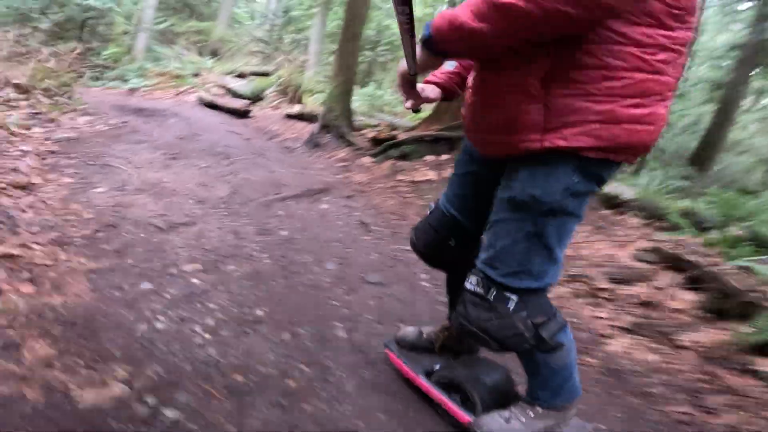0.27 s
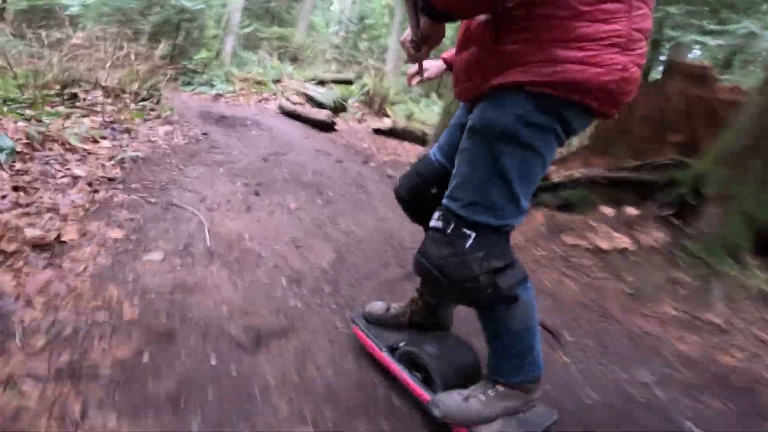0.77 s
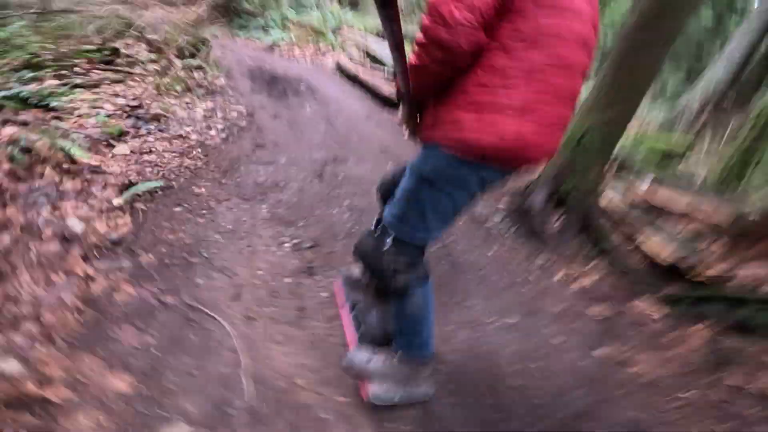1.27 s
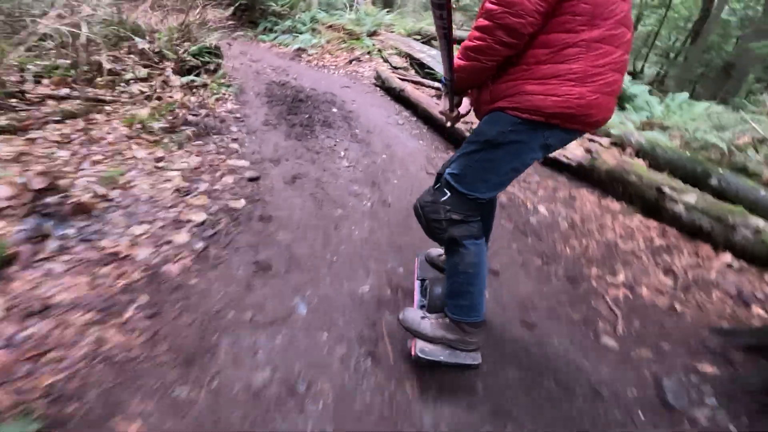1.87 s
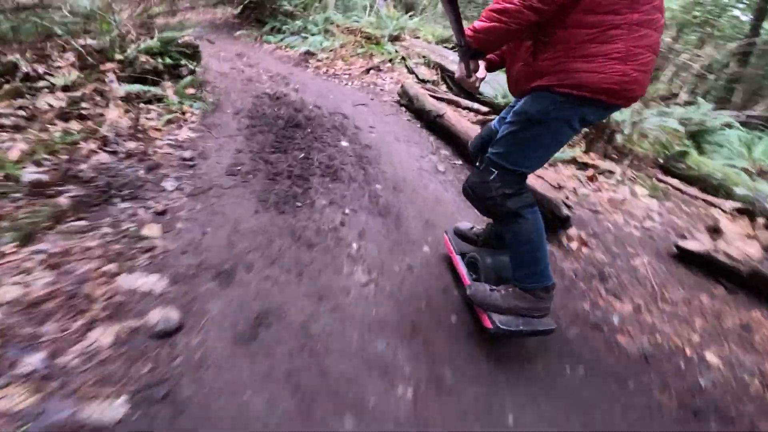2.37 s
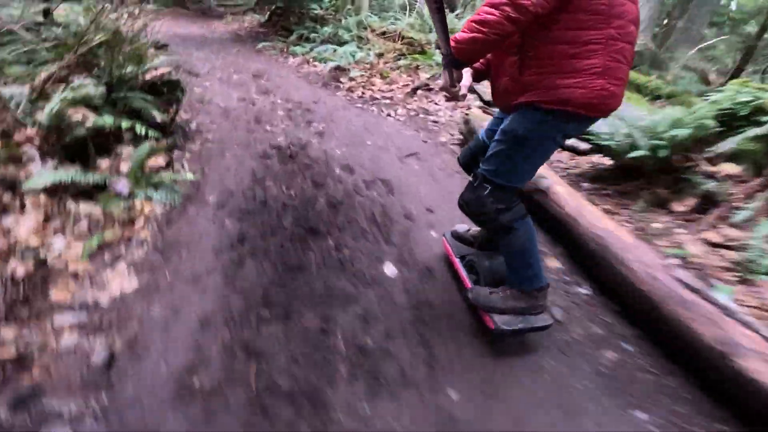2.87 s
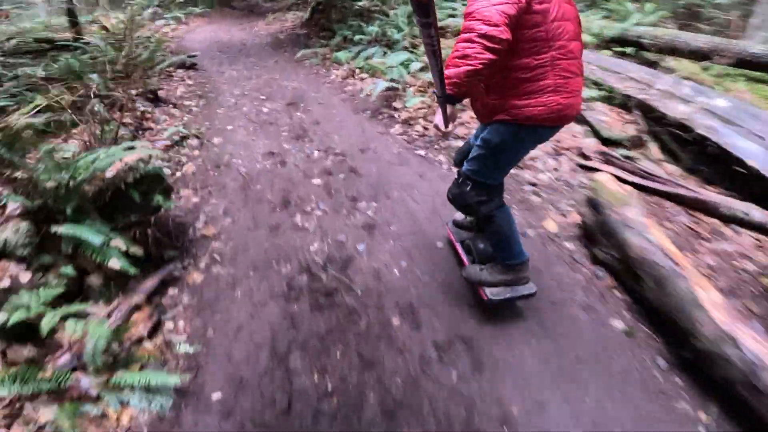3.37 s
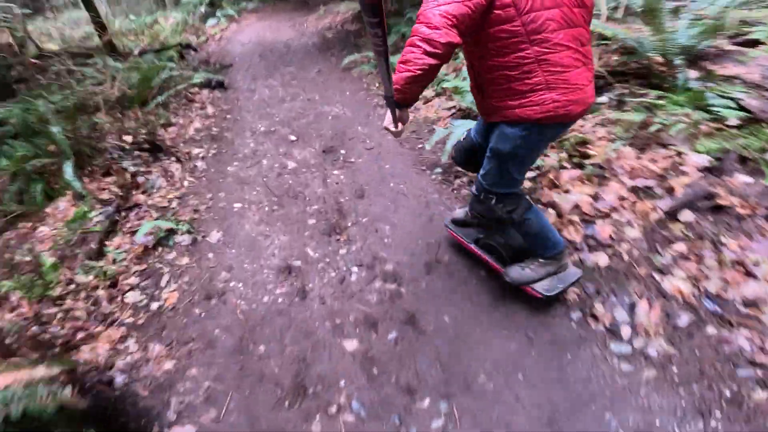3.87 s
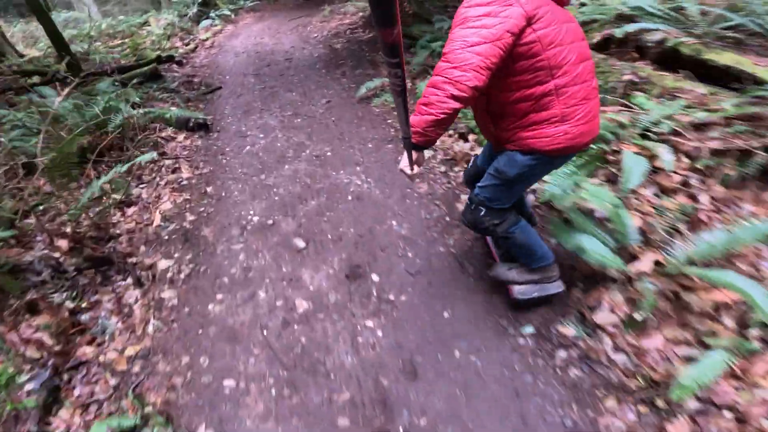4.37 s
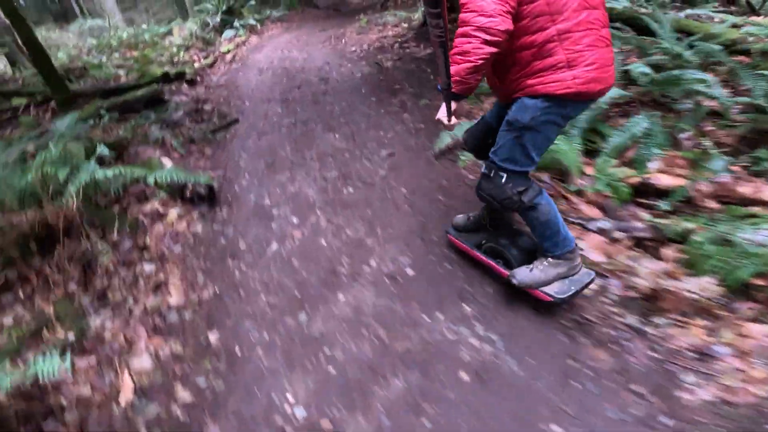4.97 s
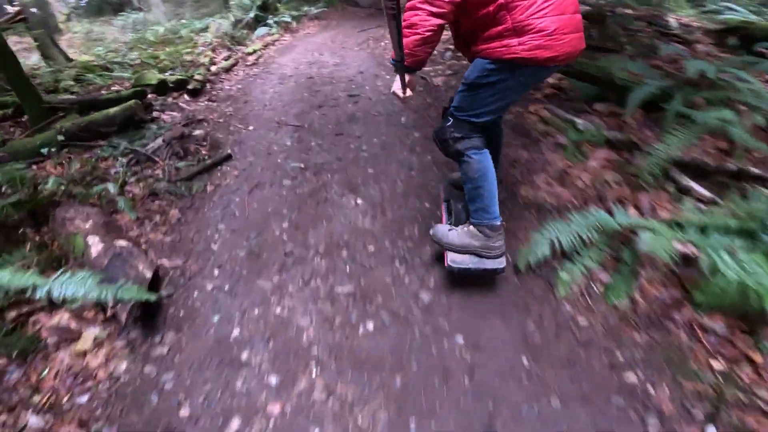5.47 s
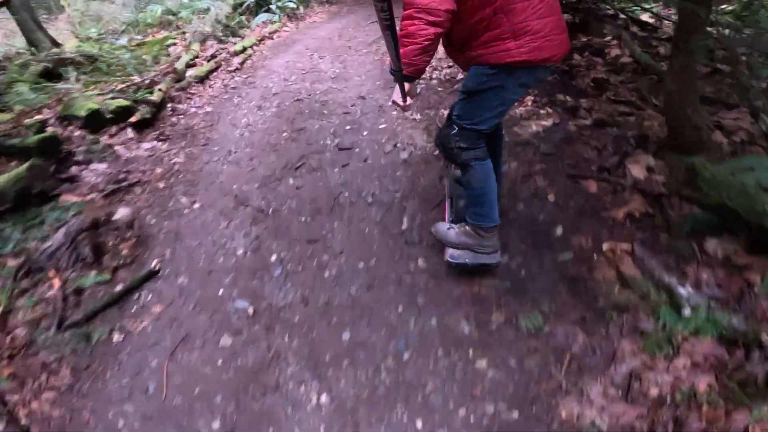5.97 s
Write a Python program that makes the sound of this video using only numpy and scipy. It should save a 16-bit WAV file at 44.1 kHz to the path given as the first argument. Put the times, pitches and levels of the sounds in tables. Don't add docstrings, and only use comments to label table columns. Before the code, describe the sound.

Wind thumps a pole-mounted microphone while a fat tyre drums over dirt, the motor hums waveringly, and wet gravel hisses midway.

```python
import sys
import numpy as np
from scipy import signal
from scipy.fft import rfft, irfft
from scipy.io import wavfile
from scipy.ndimage import uniform_filter1d

SR = 44100
rng = np.random.default_rng(int(sys.argv[2]) if len(sys.argv) > 2 else 0)


def gain_from_db(level_db):
    decades = np.asarray(level_db, float) / 20
    return 10 ** decades


def wav_out(sig):
    wavfile.write(sys.argv[1], SR, np.round(np.clip(np.atleast_2d(sig).T, -1, 1) * 32767).astype(np.int16))


N = 274302


def rms_one(x):
    return x / np.sqrt(np.mean(x ** 2) + 1e-20)


def in_time(rows):
    s, *columns = np.transpose(rows)
    return [np.interp(np.arange(N) / SR, s, c) for c in columns]


def drift(rate):
    r = np.exp(-40 * np.pi * rate / SR)
    noise = rng.standard_normal(N // 20 + 2002)
    slow = signal.lfilter([1], [1, -2 * r, r * r], noise)[2000:]
    return np.interp(np.arange(N) / 20, np.arange(len(slow)), rms_one(slow))


def coloured(x, spectrum):
    hz, db = np.transpose(spectrum)
    grid = np.maximum(np.fft.rfftfreq(N, 1 / SR), 1)
    slope_db = -24 * np.maximum(np.log2(hz[0] / grid), 0)
    gain = gain_from_db(np.interp(np.log(grid), np.log(hz), db) + slope_db)
    return rms_one(irfft(rfft(x) * gain, N))


def resonate(x, hz, width_hz):
    r = np.exp(-np.pi * width_hz / SR)
    feedback = [1, -2 * r * np.cos(2 * np.pi * hz / SR), r * r]
    return signal.lfilter([(1 - r * r) / 2, 0, (r * r - 1) / 2], feedback, x)


def resonate_twice(x, hz, width_hz):
    return resonate(resonate(x, hz, width_hz), hz, width_hz)


def evened(x, seconds, share):
    swell = uniform_filter1d(x ** 2, size=int(seconds * SR)) + 1e-3
    return rms_one(x / swell ** (share / 2))


def crunch(per_s, spread_db, grain_s, smooth):
    born = rng.random(N) < per_s / SR
    sizes = gain_from_db(spread_db * np.minimum(rng.exponential(1, N), 2.5)) * born
    r = np.exp(-1 / (grain_s * SR))
    bursts = signal.lfilter([1], [1, -2 * r, r * r], sizes + 1e-18)
    return rng.standard_normal(N) * (smooth + bursts / bursts.mean())


def swells(rows, calm_db):
    t, out = np.arange(0, N, 64) / SR, gain_from_db(calm_db)
    for s, length_s, db in rows:
        u = (t - s) / length_s
        u = np.where(u < 0, u / 0.5, u)
        out = out + gain_from_db(db) * np.exp(-u ** 2)
    return np.interp(np.arange(N) / SR, t, 20 * np.log10(out))


# top_s, length_s, buffet_db, flutter_share_db
GUSTS = [(0.0, 0.17, -15.5, -14), (0.41, 0.038, -46, 17.5), (0.468, 0.13, -27.5, -10.5),
         (0.729, 0.048, -15.5, -14), (0.915, 0.24, -26, -11), (1.387, 0.2, -24, -7.5),
         (1.552, 0.046, -44.5, 16.5), (1.747, 0.12, -20.5, -9.5), (1.966, 0.21, -48, 6.5),
         (1.967, 0.067, -24, -32), (2.205, 0.067, -74, -26), (2.356, 0.035, -45, -29),
         (2.723, 0.16, -28.5, -3.5), (3.002, 0.15, -42, 5.5), (3.25, 0.19, -33.5, -3),
         (3.451, 0.053, -26, 3), (3.617, 0.16, -24.5, -2.5), (3.916, 0.24, -25.5, 4),
         (4.139, 0.028, -41, 11.5), (4.2, 0.22, -29.5, -34), (4.46, 0.068, -33.5, -8),
         (4.603, 0.072, -27.5, -1.5), (4.755, 0.26, -39.5, -38), (4.962, 0.062, -50, 10.5),
         (5.518, 0.12, -33.5, -11.5), (5.707, 0.038, -46.5, 13), (5.878, 0.055, -34.5, 4.5),
         (6.056, 0.42, -32.5, -1.5)]
# pitch_hz, level_db [dB per Hz]
BUFFET = [(12, 16.5), (25, 17.5), (45, 10.5), (70, 7), (110, -6), (200, -63)]
FLUTTER = [(45, -39), (68, 7.5), (95, 9), (125, 5.5), (160, -9), (250, -62)]
EDDIES = [(100, -36), (140, -0.5), (200, -2), (250, -9.5), (330, -15.5), (600, -66)]


def wind():
    buffet_db = 3.0 + swells([row[:3] for row in GUSTS], calm_db=-46)
    flutter_rows = [(s, length_s, db + share_db) for s, length_s, db, share_db in GUSTS]
    flutter_db = swells(flutter_rows, calm_db=-52.5)
    usual_db = flutter_db.mean()
    rattle_db = -5 + usual_db + 0.94 * (flutter_db - usual_db)
    buffet = evened(coloured(rng.standard_normal(N), BUFFET), seconds=0.0553, share=0.96)
    lumps = gain_from_db(4.8 * drift(26.8))
    flutter = evened(coloured(lumps * rng.standard_normal(N), FLUTTER), seconds=0.087, share=0.65)
    rattle = evened(coloured(lumps * rng.standard_normal(N), EDDIES), seconds=0.095, share=0.65)
    gusts = gain_from_db(buffet_db) * buffet + gain_from_db(flutter_db) * flutter + gain_from_db(rattle_db) * rattle
    return 0.32 * np.tanh(gusts / 0.39)


# top_s, length_s, drumming_db, grit_share_db
BUMPS = [(0.003, 0.11, -33.5, -8), (0.406, 0.072, -43, -41), (0.407, 0.43, -47.5, -0.5),
         (0.615, 0.11, -43, -10.5), (0.93, 0.33, -44.5, -0.5), (1.098, 0.027, -36, -1),
         (1.216, 0.056, -46.5, -10), (1.57, 0.4, -39, -11.5), (1.738, 0.07, -39.5, -6),
         (1.868, 0.034, -38, -9), (2.003, 0.094, -46, -15), (2.314, 0.34, -48, -4.5),
         (2.33, 0.019, -47, -31), (2.663, 0.025, -51, 1), (3.003, 0.57, -49.5, 0), (3.445, 0.03, -34.5, -9),
         (3.52, 0.14, -43, -2.5), (3.69, 0.078, -52, 2), (3.94, 0.29, -46.5, -1), (4.254, 0.19, -45, -10),
         (4.56, 0.17, -44, -9.5), (4.828, 0.12, -45, -10), (4.959, 0.094, -37, -4.5),
         (5.194, 0.15, -42.5, -7.5), (5.682, 0.041, -40, -6), (5.771, 0.39, -41.5, -15.5),
         (5.877, 0.023, -35, -30), (6.08, 0.043, -55, 3.5)]
# pitch_hz, level_db [dB per Hz]
DRUMMING = [(180, -2.5), (260, -4), (330, 0.5), (420, -1.5), (560, -6), (750, -11.5), (1000, -18),
            (1600, -46)]
# pitch_hz, width_hz, level_db
CAVITY = [(420, 104, -13.5), (484.7, 23, -8), (685.4, 17.4, -16), (740.4, 17.7, -13), (1130, 27, -40)]


def drumming():
    drum_db = 1.5 + swells([row[:3] for row in BUMPS], calm_db=-54.5)
    bumps = crunch(per_s=120, spread_db=4, grain_s=0.0029, smooth=0.84)
    rings = np.zeros(N)
    for k, (hz, width_hz, db) in enumerate(CAVITY):
        ring = resonate_twice(bumps, hz, 2.0 * width_hz)
        rings += (-1) ** k * gain_from_db(db) * evened(ring, seconds=0.06, share=0.6)
    casing = coloured(bumps * gain_from_db(2.5 * drift(9)), DRUMMING)
    return gain_from_db(drum_db) * evened(casing + rings, seconds=0.04, share=0.8)


PATCH_EDGES_HZ = [900, 2600, 4300, 6200, 9000, 16000]


def patchy(x, depth_db, rate, treble_db, bite_db):
    bands = []
    for edge in zip(PATCH_EDGES_HZ, PATCH_EDGES_HZ[1:]):
        band_filter = signal.butter(2, edge, "band", fs=SR, output="sos")
        bands.append(signal.sosfiltfilt(band_filter, x) * gain_from_db(depth_db * drift(rate)))
    low = bands[0] + bands[1] * gain_from_db(bite_db) + bands[2]
    return low + bands[-2] * gain_from_db(0.38 * treble_db) + bands[-1] * gain_from_db(treble_db)


# middle_s, length_s, depth_db
HOPS = [(0.756, 0.021, -4.5), (1.447, 0.12, -14), (1.836, 0.016, -6), (2.536, 0.024, -3), (3.032, 0.15, -5),
        (3.235, 0.073, -3), (3.546, 0.06, -10), (3.795, 0.027, -3.5), (4.715, 0.14, -9.5),
        (5.09, 0.032, -5.5), (5.674, 0.013, -12), (5.767, 0.02, -10), (5.946, 0.076, -9.5),
        (6.165, .04, -2)]
# time_s, level_db
SPRAYING = [(0.0, -53.5), (0.09, -54.5), (0.7, -56.5), (0.82, -61.5), (1.12, -53.5), (1.7, -58.5),
            (2.07, -53.5), (2.11, -47), (2.6, -45), (2.86, -39), (3.45, -37.5), (3.66, -39), (3.92, -46),
            (4.04, -51), (4.55, -59), (5.2, -53.5), (5.5, -56.5), (6.22, -59)]
# time_s, mist_db [extra treble], sand_db [extra bite near 3 kHz]
MIST = [(0, 1.5, 2), (.5, -1.5, 1.5), (.8, 5.5, 3.5), (1.08, -2, -1), (1.4, 5.5, 7.5), (2.0, -2, 2),
        (2.15, -2, -1.5), (2.55, 2, 0), (3.0, -1.5, 0.5), (3.45, -2, -2.5), (3.55, -4, 2), (3.8, -2.5, 1),
        (4.3, -3.5, 2.5), (4.7, 1.5, 2), (5.0, -1.5, -3.5), (5.4, 2.5, 3), (5.8, -0.5, 0), (6.22, -4, 0.5)]
# pitch_hz, level_db [dB per Hz]
GRIT = [(500, -8), (850, 3.5), (1300, 2), (2000, -1), (3200, -13), (4500, -18.5), (7000, -72), (12000, -66)]
SPRAY = [(1000, -18), (1600, -13.5), (2200, -2), (3300, -2.5), (4800, -6.5), (7200, -8.5), (9000, 0.5),
         (11000, -4), (13500, -9.5), (15500, -23)]


def grit_and_spray():
    t = np.arange(N) / SR
    hop_db = sum(depth_db * np.exp(-((t - s) / length_s) ** 2) for s, length_s, depth_db in HOPS)
    grit_rows = [(s, length_s, db + share_db) for s, length_s, db, share_db in BUMPS]
    grit_db = -3.0 + swells(grit_rows, calm_db=-55) + 0.28 * hop_db
    spray_db = in_time(SPRAYING)[0] + hop_db
    clumps = drift(14.3)
    grains = crunch(per_s=260, spread_db=4.5, grain_s=0.00071, smooth=1.7)
    grit = coloured(grains * gain_from_db(0.68 * clumps), GRIT)
    drops = crunch(per_s=200, spread_db=6, grain_s=0.00081, smooth=9)
    spray = coloured(drops * gain_from_db(1.67 * clumps), SPRAY)
    mist_db, sand_db = in_time(MIST)
    spray = patchy(spray, depth_db=1.13, rate=43, treble_db=mist_db, bite_db=sand_db)
    return gain_from_db(grit_db + 0.5) * grit + gain_from_db(spray_db + 3.5) * spray


# top_s, length_s, hum_db
SURGES = [(0.016, 0.092, -42), (0.383, 0.11, -37), (0.575, 0.036, -58), (0.69, 0.074, -46),
          (0.986, 0.05, -40.5), (1.153, 0.054, -45), (1.459, 0.92, -45), (1.564, 0.08, -38.5),
          (1.888, 0.38, -54), (2.553, 0.035, -43), (2.714, 0.1, -44), (2.959, 0.031, -37.5),
          (3.061, 0.096, -42.5), (3.211, 0.021, -40), (3.433, 0.21, -43), (3.678, 0.1, -39),
          (3.916, 0.083, -48), (4.137, 0.54, -52), (4.5, 0.1, -42), (4.831, 0.1, -48), (4.966, 0.14, -46),
          (5.16, 0.085, -60), (5.312, 0.059, -40.5), (5.49, 0.039, -44.5), (5.712, 0.15, -40.5),
          (6.051, 0.12, -42)]
# time_s, shift_hz
HUM_LEAN = [(0, 0), (.4, 4), (1.0, 4), (1.45, -8), (1.65, 12), (2.0, 2), (2.3, -10), (2.55, 0), (2.8, -16),
            (3.1, -8), (3.5, -8), (4.0, 0), (4.4, -4), (4.55, 6), (5.3, -4.5), (5.8, 8), (6.22, -5.5)]


def motor_hum():
    hum_db = swells(SURGES, calm_db=-51.5)
    waver_hz = in_time(HUM_LEAN)[0] + 5 * drift(4) + 7 * drift(18)
    turn = 2 * np.pi * np.cumsum(483 + waver_hz) / SR
    shake = (drift(18) * np.sin(turn) + drift(18) * np.cos(turn)) / np.sqrt(2)
    return gain_from_db(hum_db - 2.0) * evened(np.sin(turn) + 0.5 * shake, seconds=0.07, share=0.8)


# start_s, peak_db, pitch_hz, bright_share_db
STONES = [(0.0153, -19, 1550, -23), (0.041, -19, 1200, -55), (0.386, -46, 885, -26),
          (0.4201, -27.5, 915, -18), (0.488, -25, 1270, -20), (0.508, -32.5, 1080, -31),
          (0.659, -37, 1960, -35), (0.7918, -34.5, 1360, -21), (0.935, -28, 1210, -33),
          (0.938, -34.5, 2970, -31), (1.0736, -31.5, 1000, -12), (1.106, -22, 1010, -15),
          (1.2918, -33, 790, -16), (1.5673, -35.5, 930, -30), (1.7435, -25, 910, -29),
          (1.788, -37, 910, -31), (2.275, -28, 960, -18), (2.6607, -28, 2900, -22), (4.037, -24, 1560, -44),
          (4.4993, -31, 1040, -17), (4.552, -38, 1130, -17), (4.8288, -36, 920, -37),
          (4.9266, -25, 1900, -6), (4.9602, -30, 1100, -58), (4.9724, -21.5, 1490, -9),
          (4.976, -18.5, 2640, -16), (5.0258, -35.5, 1910, 2), (5.207, -34, 895, -18),
          (5.344, -32.5, 3380, -26), (5.782, -40, 1190, -23), (5.881, -31.5, 850, -35),
          (5.997, -39, 950, -26)]
# start_s, peak_db, pitch_hz, bright_share_db
TICKS = [(0.827, -33, 1700, -25), (0.4342, -37, 3060, -6), (0.603, -36, 1070, -26),
         (1.026, -32.5, 2600, -28), (1.1689, -33, 1600, -25), (1.6186, -35, 1880, -42),
         (2.239, -29, 2800, -9), (2.352, -31, 2580, -22), (2.4062, -27.5, 3000, -8),
         (2.583, -32.5, 3110, -6), (2.764, -27, 3340, -5), (2.8456, -28, 3470, -4), (3.02, -31, 3020, -31),
         (3.132, -32.5, 1980, 6), (3.3694, -34, 2560, 4), (3.445, -28, 720, -30), (3.615, -25, 2320, -30),
         (4.3877, -32.5, 2170, -46), (4.8554, -41.5, 1550, -18), (4.9038, -35, 850, -37),
         (4.936, -37, 1690, -11), (4.970, -20, 1090, -35), (4.983, -33, 1590, -3), (5.225, -32, 3020, -12),
         (5.27, -51, 1840, 0), (5.3077, -33, 1000, -9)]
# start_s, peak_db, pitch_hz, bright_share_db
CRUMBS = [(0.0024, -20, 1120, -27), (0.0274, -22, 1150, -23), (0.058, -33, 1110, -25),
          (0.0714, -31, 1120, -25), (0.0834, -36, 1100, -25), (0.142, -29, 1250, -22),
          (0.2338, -31, 1760, -23), (0.3126, -41, 1170, -27), (0.3436, -26.5, 1170, -21),
          (0.409, -30, 1100, -25), (0.562, -30, 1150, -25), (0.7362, -30, 1140, -18),
          (0.778, -37, 1390, -25), (0.8677, -31, 1170, -25), (0.884, -45, 1110, -25),
          (0.9004, -38, 1200, -25), (0.9664, -35, 1280, -29), (0.9894, -41, 1100, -25),
          (1.0863, -28, 1220, -25), (1.205, -30, 1290, -23), (1.4531, -37, 1100, -36),
          (1.535, -32, 1150, -25), (1.7697, -23.5, 1210, -21), (2.0014, -34, 1420, -31),
          (2.4822, -30, 3360, -25), (2.7446, -31, 3100, -25), (2.9265, -21.5, 2680, -25),
          (2.9542, -22, 3080, -25), (3.435, -23, 2070, -23), (3.4898, -24, 3200, -21),
          (3.5727, -24.5, 1790, -21), (3.6474, -19, 2240, -25), (3.679, -30, 2570, -25),
          (3.759, -38, 2744, -35), (4.221, -38, 1100, -25), (4.7744, -46, 1330, -25),
          (4.801, -40, 1210, -27), (4.954, -29, 900, -45), (4.998, -40, 1620, -30),
          (5.0134, -29, 1670, -32), (5.1302, -34, 1490, -25), (5.1537, -39, 1210, -25),
          (5.1834, -40, 1130, -25), (5.3844, -36, 3420, -21), (5.5627, -34, 2140, -27),
          (5.6675, -41, 1180, -25), (5.6954, -37, 1150, -25), (5.7394, -38, 1400, -25),
          (5.796, -30.5, 1100, -25), (5.8386, -30, 1410, -20)]


def stones():
    out, t = np.zeros(N), np.arange(2048) / SR
    bright = signal.butter(2, [3000, 11500], "band", fs=SR, output="sos")
    # knock in the deck [dB], width of the ring as a share of its pitch
    hits = [(*row, -4.5, 0.45) for row in STONES]
    hits += [(*row, -13, 0.37) for row in TICKS]
    hits += [(s, db - 5.5, hz, crack_db, -7.5, 1.15) for s, db, hz, crack_db in CRUMBS]
    for s, peak_db, hz, crack_db, knock_db, spread in hits:
        body, crack, knock = rng.standard_normal((3, len(t)))
        u = t * (hz / 1500) ** 0.25
        fade = np.exp(-(u / 0.0033) ** 2) + 0.28 * np.exp(-u / 0.01)
        burst = (1 - np.exp(-(u / 0.00088) ** 2)) * fade
        body = body * burst
        ring = resonate_twice(body, hz, spread * hz)
        overtone_db = -16.0 + 0.45 * (crack_db + 25)
        ring += gain_from_db(overtone_db) * resonate_twice(body, 2.62 * hz, 1.0 * hz)
        crack_shape = np.exp(-((t - 0.0028) / 0.0024) ** 2)
        crack = signal.sosfilt(bright, crack * crack_shape)
        knock = resonate_twice(knock * burst, 350, 530)
        hit = ring / abs(ring).max() + gain_from_db(crack_db + 2.5) * crack / abs(crack).max()
        hit += gain_from_db(knock_db) * knock / abs(knock).max()
        at = max(round((s - 0.0006) * SR), 0)
        out[at:at + len(t)] += gain_from_db(peak_db + 1.5) * hit[:N - at]
    return out


# start_s, peak_db, pitch_hz
TAPS = [(0.015, -19, 1400), (0.386, -34, 850), (0.421, -27, 900), (0.780, -33, 1200), (0.936, -33, 3000),
        (1.107, -22, 1000), (1.292, -33, 804), (1.508, -33, 720), (2.276, -28, 1000), (2.660, -32, 1500),
        (3.4435, -23, 600), (3.452, -25, 450), (3.615, -28, 2200), (4.036, -31, 1500), (4.855, -36, 1300),
        (4.9045, -27, 800), (4.914, -26, 650), (4.9603, -19, 1100), (4.9693, -24, 1060), (4.9734, -17, 513),
        (4.978, -14, 480), (4.927, -24.5, 3250), (4.929, -32, 6300), (4.951, -29, 1000),
        (4.9757, -25, 2620), (4.977, -22, 1100), (4.9945, -23, 596), (4.9995, -24, 1410),
        (5.225, -30, 1600), (5.31, -34, 1000), (5.782, -33, 1100), (5.880, -24, 800), (5.999, -40, 900)]


def taps():
    out, t = np.zeros(N), np.arange(1024) / SR
    shape = (1 - np.exp(-(t / 0.00043) ** 2)) * np.exp(-t / 0.0031)
    for s, peak_db, hz in TAPS:
        at = round(s * SR)
        tap = np.sin(2 * np.pi * hz * t) * shape
        out[at:at + len(t)] += gain_from_db(peak_db - 1.5) * tap[:N - at]
    return out


# start_s, peak_db, pitch_hz
JOLTS = [(0.057, -16, 64.26), (0.093, -14, 118.8), (0.396, -6, 72.4), (0.702, -5.5, 42.7),
         (1.352, -17, 110), (1.464, -21.5, 189.6), (1.568, -20, 200), (1.75, -19, 70), (0.29, -32, 380),
         (1.1, -24, 320), (1.698, -26, 37), (1.711, -16.5, 144), (2.659, -15, 39.2), (3.431, -32, 41.04),
         (3.439, -20, 191), (3.63, -9, 59.6), (4.003, -18, 142), (4.618, -16, 131), (4.642, -17, 70.4),
         (5.14, -30, 200), (6.1, -22, 170), (4.969, -12, 240), (5.668, -41, 48.7), (5.853, -18, 88),
         (5.88, -15, 178)]


def jolts():
    out, t = np.zeros(N), np.arange(8192) / SR
    for s, peak_db, hz in JOLTS:
        at = round(s * SR)
        swing = np.sin(2 * np.pi * hz * t) * np.exp(-t * hz / 1.87)
        out[at:at + len(t)] -= gain_from_db(peak_db - 6.5) * swing[:N - at]
    return out


# middle_s, length_s, level_db, pitch_hz
SCUFFS = [(0.802, .025, -55, 3100), (.85, 0.033, -48.5, 2960), (0.806, .03, -58, 7000),
          (.86, .03, -61, 6000), (1, .03, -55, 7700), (.99, .012, -49, 3000), (1.05, .012, -56, 3500),
          (1.8, 0.025, -54, 3140), (2.27, 0.05, -49.5, 5500), (2.3, 0.12, -47, 8000),
          (2.43, 0.041, -50, 5600), (2.17, .05, -56, 7300), (2.8, 0.069, -48, 4800), (3.13, .03, -44, 6500),
          (3.38, .08, -55, 6600), (3.47, 0.063, -45.5, 2000), (3.7, 0.074, -47.5, 2000),
          (3.88, .05, -53, 6500), (4.55, 0.022, -53, 3300), (4.545, .025, -58, 7000), (3.9, .04, -63, 4500),
          (4.99, .012, -48, 5000), (5.35, 0.065, -58, 4000), (5.4, .12, -52.5, 600), (0.35, 0.09, -46, 350),
          (4.2, .12, -54, 1930), (5.75, 0.077, -60.5, 2600), (.58, .05, -57, 3000), (5.7, 0.044, -61, 4000)]


def scuffs():
    out = np.zeros(N)
    grains = crunch(per_s=400, spread_db=6.0, grain_s=0.0008, smooth=2.5)
    for s, length_s, db, hz in SCUFFS:
        a, b = max(int((s - 3 * length_s) * SR), 0), int((s + 3 * length_s) * SR)
        hiss = resonate_twice(grains[a:b], hz, 0.35 * hz)
        swell = np.exp(-((np.arange(a, b) / SR - s) / length_s) ** 2)
        out[a:b] += gain_from_db(db) * rms_one(hiss) * swell
    return out


# start_s, length_s, level_db
WHINE = [
    (0.56, 0.13, -60),
    (1.107, 0.2, -49),
]


def motor_whine():
    t, level = np.arange(N) / SR, np.zeros(N)
    whine = rms_one(resonate_twice(rng.standard_normal(N), hz=12100, width_hz=1700))
    for s, length_s, db in WHINE:
        rise = np.maximum(s - t, 0) / 0.015
        fall = np.maximum(t - s - length_s, 0) / 0.03
        level += gain_from_db(db) * np.exp(-rise ** 2 - fall ** 2)
    return whine * level


# start_s, peak_db
SNAPS = [
    (1.075, -31),
    (5.224, -20),
    (5.27, -29),
    (6.2165, -30.5),
]


def twigs():
    out, t = np.zeros(N), np.arange(512) / SR
    treble = signal.butter(2, 8400, "high", fs=SR, output="sos")
    for s, peak_db in SNAPS:
        at = round(s * SR)
        burst = rng.standard_normal(len(t)) * np.exp(-(t / 0.0011 - 1.4) ** 2)
        out[at:at + len(t)] += gain_from_db(peak_db) * signal.sosfilt(treble, burst)[:N - at]
    return out


def scene():
    ground = drumming() + grit_and_spray() + scuffs() + twigs()
    deck = stones() + taps()
    motor = motor_hum() + motor_whine()
    return (wind() + ground + deck + motor + jolts())[None]


def roll_off(x):
    return signal.sosfilt(signal.butter(12, 15650, fs=SR, output="sos"), x)


def record(dry):
    passed = signal.sosfiltfilt(signal.butter(12, 7580, fs=SR, output="sos"), dry)
    leak = signal.sosfiltfilt(signal.butter(2, 12860, fs=SR, output="sos"), dry - passed)
    mix = passed + gain_from_db(-16) * leak
    return roll_off(mix)


dry = scene()
out = record(dry)
wav_out(out)
```